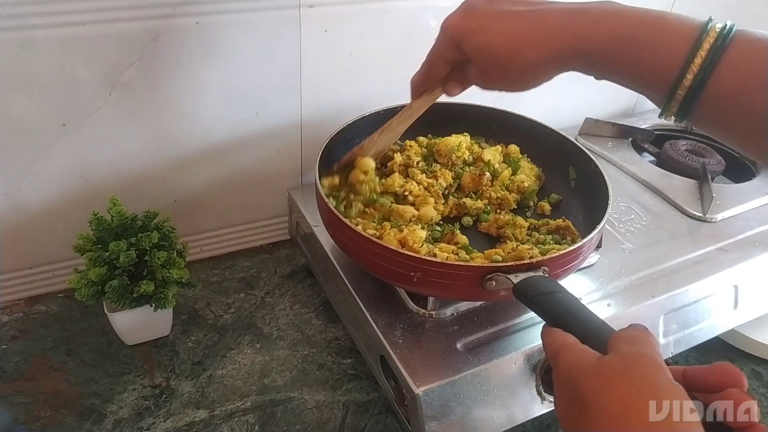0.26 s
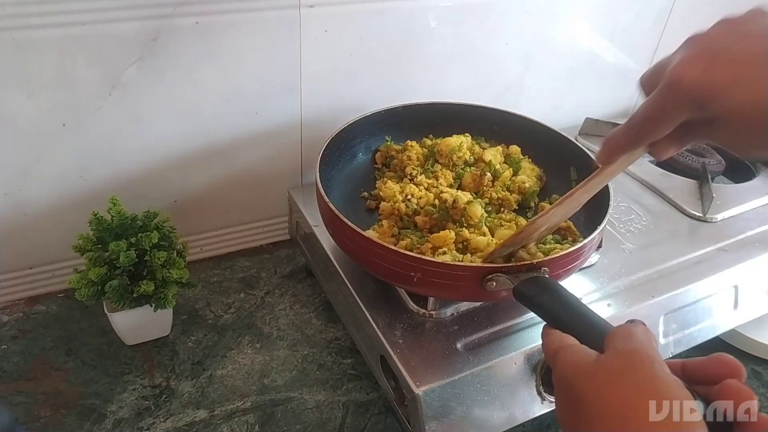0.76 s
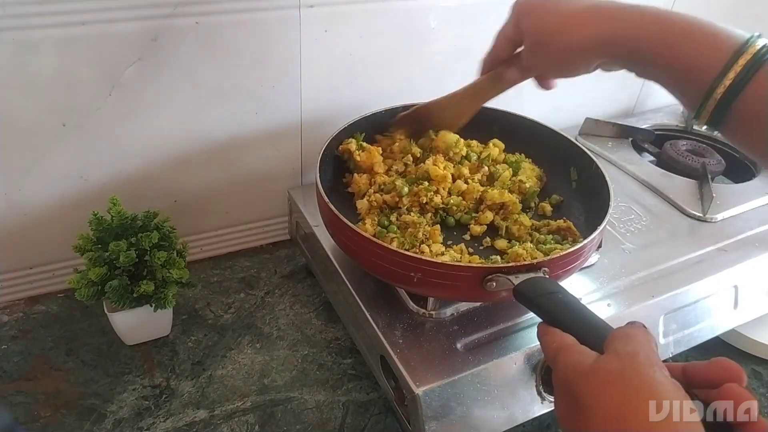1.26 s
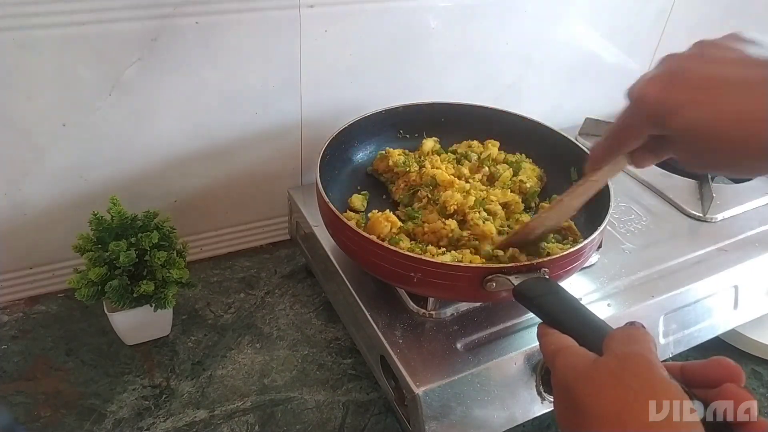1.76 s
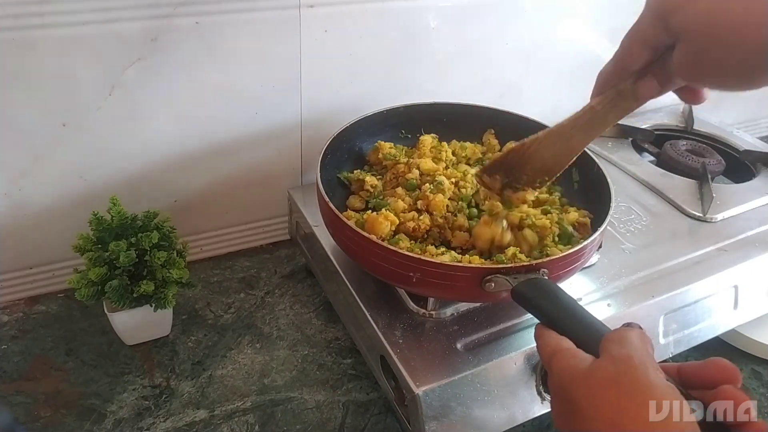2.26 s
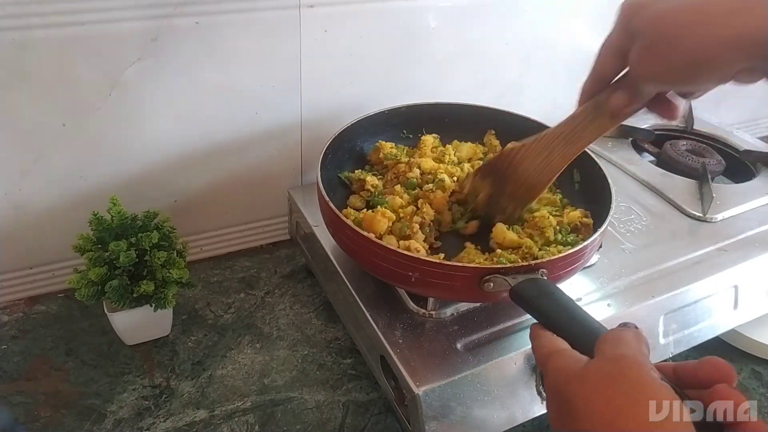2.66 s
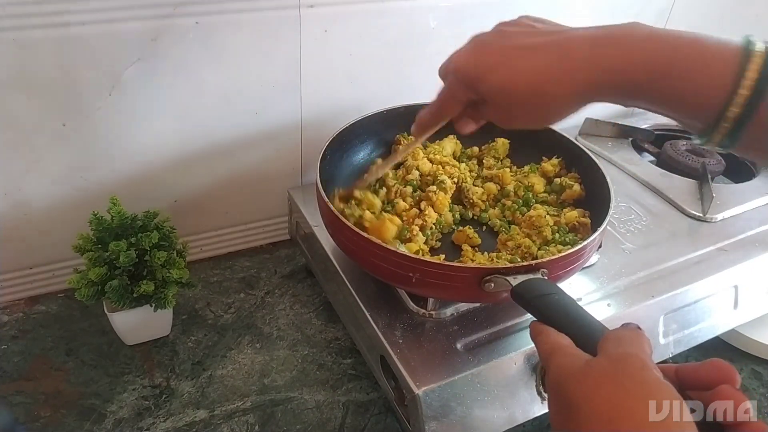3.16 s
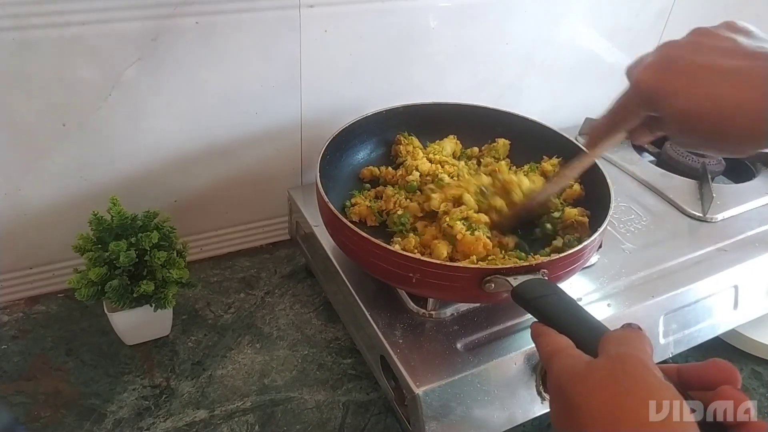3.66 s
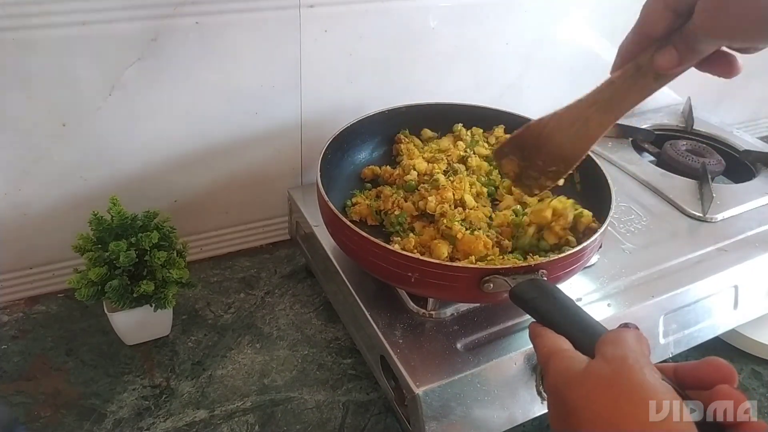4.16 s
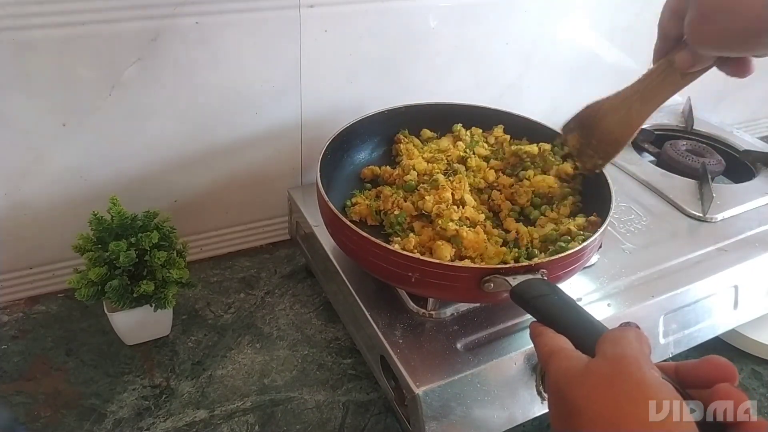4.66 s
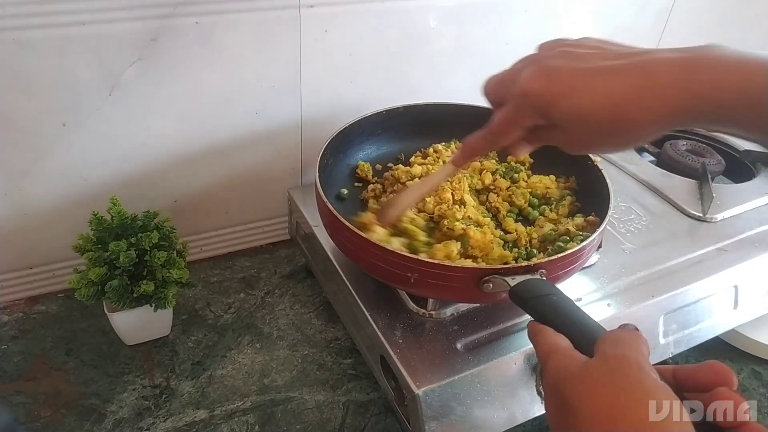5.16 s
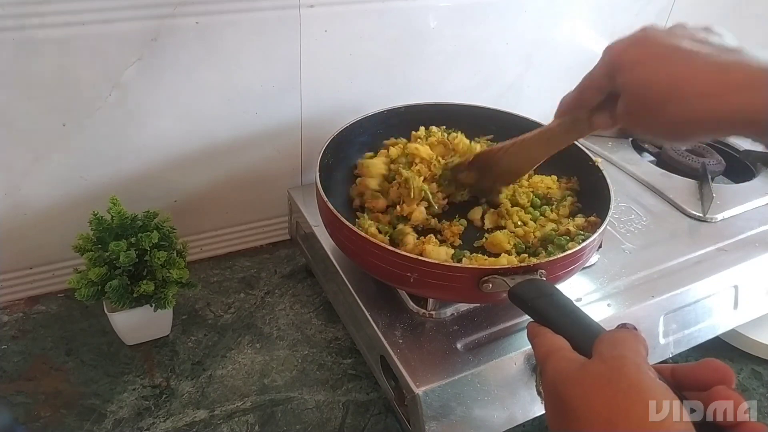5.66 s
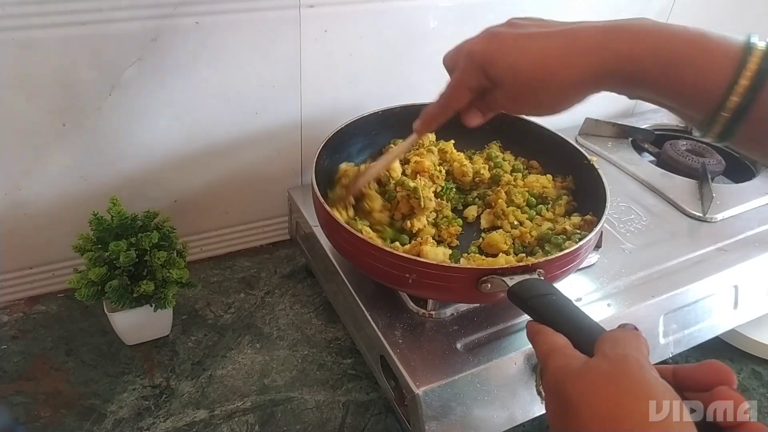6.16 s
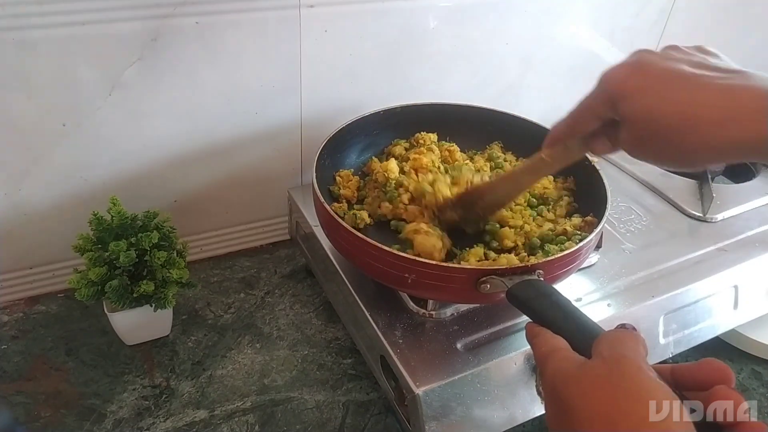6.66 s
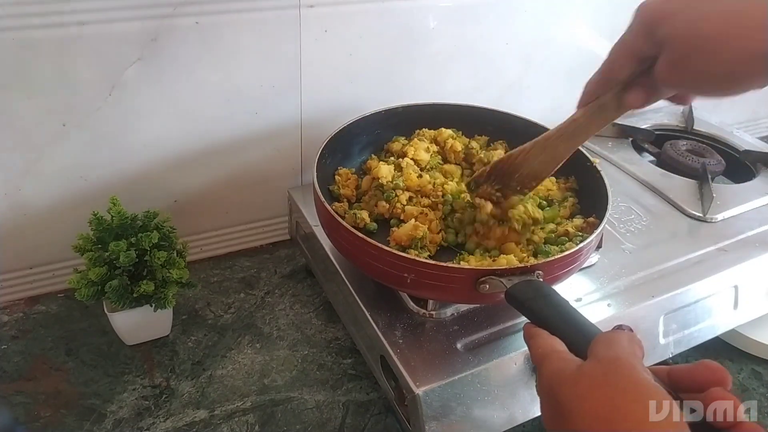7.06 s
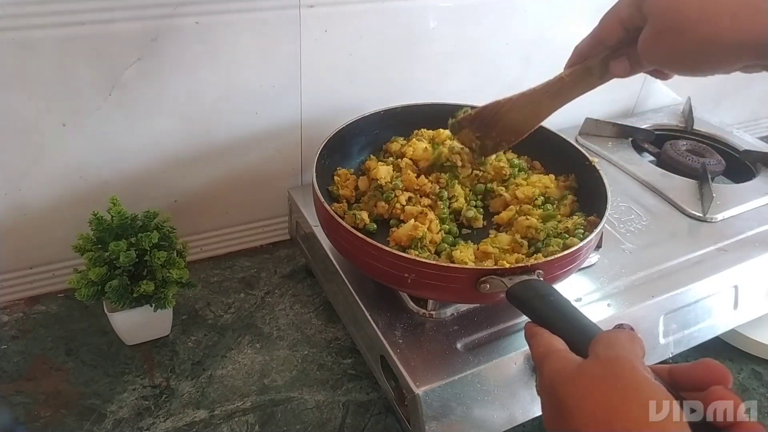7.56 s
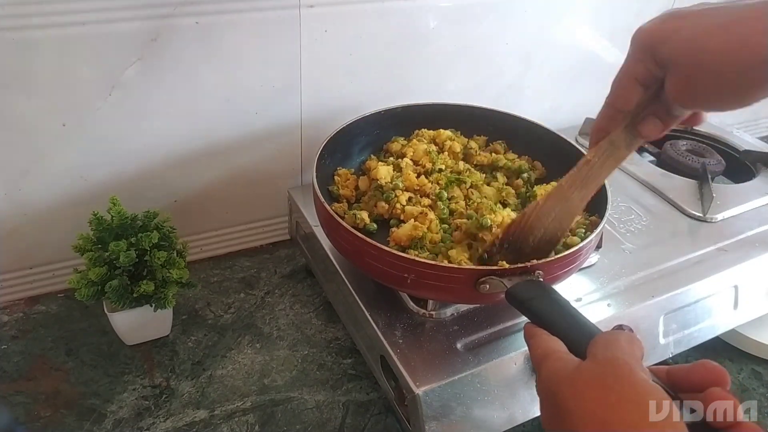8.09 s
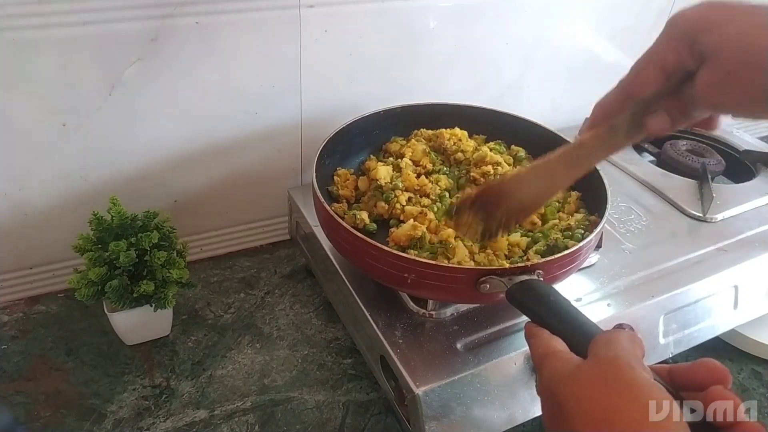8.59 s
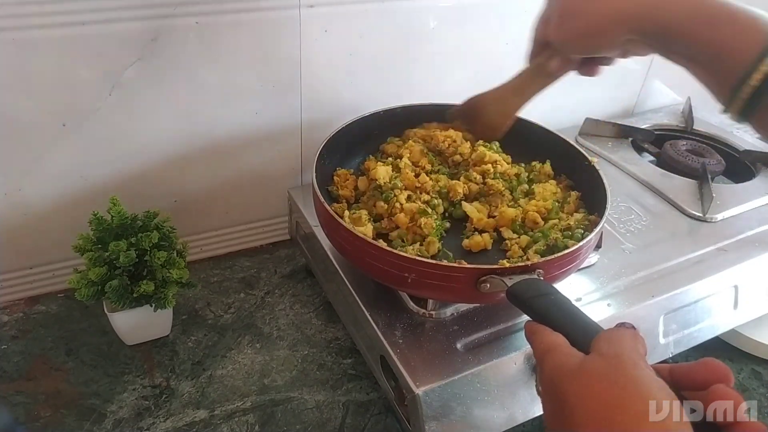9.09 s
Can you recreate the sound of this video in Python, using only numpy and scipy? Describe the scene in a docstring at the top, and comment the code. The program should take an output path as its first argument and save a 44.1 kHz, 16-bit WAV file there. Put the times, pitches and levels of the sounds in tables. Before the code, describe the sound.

A wooden spatula knocks and scrapes around a frying pan, stirring crumbly food over a faint sizzle, with small bangle clinks.

```python
"""Stirring a frying pan

A wooden spatula turns a thick, crumbly mixture in a nonstick pan on a steel hob, in a hard-walled
kitchen. Each stroke lands with a knock that excites the pan's modes and may rock it into a clack;
friction then makes the blade scrape and groan while the food rustles. Bangles clink on the stirring
wrist and moisture sizzles faintly."""
import sys
import numpy as np
from scipy import signal
from scipy.fft import rfft, irfft, next_fast_len
from scipy.io import wavfile
from scipy.ndimage import uniform_filter1d

SR = 44100
rng = np.random.default_rng(int(sys.argv[2]) if len(sys.argv) > 2 else 0)


def transcribe(signal):
    """Save signal, clipped to [-1, 1], as a 16-bit WAV file at the path in sys.argv[1]."""
    frames = np.atleast_2d(signal).T
    limited = np.clip(frames, -1, 1)
    pcm = np.round(limited * 32767).astype(np.int16)
    wavfile.write(sys.argv[1], SR, pcm)


N = 411453
TIME = np.arange(N) / SR

# landings of the blade: t/s, knock level/dB, thump level/dB, crunch level/dB, contact decay/s,
# hardness/(dB per octave), blade note f/Hz, drag level/dB
LANDINGS = [(0.659, -55, -57, -62, 0.0052, -4, 800, -66), (0.675, -72, -58, -56, 0.0028, -1, 800, -72),
            (0.932, -36.5, -45.5, -47.5, 0.013, -3, 1810, -46),
            (1.313, -60, -54, -53, 0.0075, -5, 796, -70), (1.326, -33, -47, -45.5, 0.009, 1.5, 2250, -52.5),
            (1.897, -35, -54, -42, 0.0028, 1.5, 2200, -47),
            (1.919, -36.5, -49, -56, 0.017, -0.5, 2090, -58), (1.982, -44, -50, -63, 0.013, -4, 900, -56),
            (2.182, -46, -62, -55, 0.0086, -3, 2000, -58), (2.339, -41.5, -66, -68, 0.0046, -8, 1400, -75),
            (2.635, -48, -41, -51, 0.012, -4, 1450, -49),
            (3.026, -38, -41.5, -45.5, 0.0036, -3.5, 1650, -67),
            (3.037, -49, -42.5, -53, 0.0035, -8, 1100, -68),
            (3.545, -41, -53.5, -57, 0.015, -7.5, 1950, -58),
            (3.728, -33, -47.5, -43, 0.0047, 0.5, 1510, -49.5),
            (3.756, -33.5, -51, -52, 0.018, -1, 1390, -49.5),
            (4.055, -49, -45.5, -64, 0.015, -6, 1600, -55.5), (4.4, -62, -52, -68, 0.011, -9, 800, -75),
            (4.409, -37, -47.5, -42.5, 0.006, 6.5, 1050, -61),
            (4.505, -46, -45.5, -43.5, 0.012, 2, 800, -51.5),
            (4.591, -41.5, -51.5, -62, 0.015, 1.5, 1050, -55.5),
            (4.676, -47.5, -60, -64, 0.0071, -2.5, 2000, -65), (4.817, -51, -55, -62, 0.0083, 4, 1650, -71),
            (5.637, -29.5, -44, -42.5, 0.005, -2, 2430, -46),
            (5.647, -36, -45.5, -50, 0.0056, -6, 1110, -52), (6.582, -56, -63, -55, 0.0083, 9.5, 2000, -70),
            (6.738, -29.5, -40.5, -41.5, 0.01, 0, 1000, -48),
            (6.766, -35.5, -43.5, -56, 0.013, -1.5, 1040, -63),
            (7.505, -34, -56, -47, 0.012, -0.5, 1400, -51.5), (7.79, -46, -51, -58, 0.0096, 1.5, 900, -68),
            (8.102, -47, -55, -48, 0.03, 7, 1880, -56.5), (8.184, -51, -59, -60, 0.015, 2, 1880, -60),
            (8.461, -42.5, -51.5, -54, 0.0097, -2.5, 850, -58),
            (8.527, -47.5, -54, -53, 0.014, 0, 1900, -66), (8.785, -20.5, -40, -41, 0.0018, 2, 2710, -43.5),
            (8.795, -26.5, -43.5, -56, 0.0069, -5, 900, -55)]
# bright hiss of rustle and sizzle, with the microphone's resonance near 9.5 kHz: f/Hz, level/dB
HISS_SPECTRUM = [(1000, -18.5), (3000, -15), (5600, -13), (7200, -9), (8600, -3), (10000, -1.5),
                 (11000, -6.5), (11900, -16.5), (13500, -16), (15300, -23)]


def landings():
    """Impact of wood on metal: the blade knocks, the pan's base thumps and the food between crunches."""
    thump_spectrum = [(60, -32), (150, -18.5), (250, -12), (350, 4.5), (480, -1.5), (700, -7), (1100, -11),
                      (2500, -36.5)]  # f/Hz, level/dB
    out = np.zeros(N)
    for s, knock_db, thump_db, crunch_db, fade_s, hardness, blade_hz, _ in LANDINGS:
        rise_s = 0.1 * fade_s  # food cushions the blow, so a longer contact builds up more slowly
        knock = contact(knock_spectrum(hardness), fade_s, drag_db=-30.5, drag_s=0.062, rise_s=rise_s)
        thump = contact(thump_spectrum, fade_s, drag_db=-26.5, drag_s=0.11, rise_s=rise_s)
        crunch = contact(HISS_SPECTRUM, fade_s, drag_db=-6, drag_s=0.045, rise_s=rise_s)
        add(out, s, from_db(knock_db - 7.5) * (knock + resonance(knock, blade_hz, width_hz=186)))
        add(out, s, from_db(thump_db + 2) * thump)
        add(out, s, from_db(crunch_db + 2.5) * crunch)
    return out


def knock_spectrum(hardness, pivot_hz=1400):
    """Contact stiffness: a harder blow tilts the wood's spectrum towards the treble."""
    wood_spectrum = [(90, -56), (250, -23), (600, -3), (900, -1), (1400, 2), (2000, -0.5), (2700, -4.5),
                     (3300, -10.5), (5000, -17.5), (8000, -28.5)]  # f/Hz, level/dB
    return [(hz, db + hardness * np.log2(hz / pivot_hz)) for hz, db in wood_spectrum]


def pan(force, spot_db=2.4, spots_per_s=6):
    """Modal response: the food-damped pan rings, and each point of contact favours different modes."""
    pan_modes = [(178, 18.6, 5), (261.3, 12, 6), (389, 62, -7), (470, 38, -3.5), (532, 14, -3.5),
                 (616.5, 15, 5), (744, 24, -5), (797, 83, 0.8), (872, 27, -8.5), (1030, 56, 2.5),
                 (1106, 30, 2), (1187, 13, 0), (1400, 7.3, -17), (1685, 220, -9.5), (1900, 75, -6),
                 (2074, 225, 0), (2686, 130, 0), (2834, 93, -2), (3430, 130, -12), (3780, 210, 0),
                 (4190, 180, -0.5), (4920, 130, -1)]  # f/Hz, bandwidth/Hz, level/dB relative to the force
    ringing = 0
    for hz, width_hz, db in pan_modes:
        coupling = from_db(spot_db * drift(spots_per_s))
        ringing += from_db(db) * resonance(force * coupling, hz, width_hz)
    return force + ringing


def scraping():
    """Sliding friction: the blade rubs and scratches the coating while crumbs rustle ahead of it."""
    # sweeps along the pan's wall: start t/s, hold/s, rustle level/dB, scratch level/dB
    wall_sweeps = [(0.128, 0.24, -44.5, -49.5), (1.423, 0.092, -49, -57.5), (3.027, 0.21, -51.5, -61.5),
                   (4.773, 0.083, -51, -58), (4.904, 0.28, -47.5, -59), (6.008, 0.23, -48, -53.5),
                   (8.08, 0.017, -48, -58), (9.111, 0.22, -48.5, -53)]
    # short pushes across the base: middle t/s, duration/s, level/dB
    base_pushes = [(0.01, 0.13, -47), (0.2, 0.057, -50), (0.39, 0.15, -51), (1.168, 0.14, -65),
                   (1.873, 0.098, -56), (2.218, 0.1, -55), (2.402, 0.15, -53), (2.865, 0.17, -56),
                   (3.187, 0.1, -46), (3.93, 0.29, -49), (4.283, 0.11, -53.5), (4.832, 0.1, -65),
                   (5.106, 0.2, -47.5), (5.87, 0.25, -54), (6.234, 0.21, -50), (6.725, 0.091, -49),
                   (7.057, 0.21, -53.5), (7.277, 0.22, -58.5), (7.734, 0.21, -57.5), (7.936, 0.083, -56),
                   (8.21, 0.075, -50.5), (8.44, 0.1, -55.5), (8.606, 0.23, -55.5)]
    # heaps of food sliding off the blade: middle t/s, level/dB
    food_tumbles = [(2.28, -50), (2.98, -55), (3.68, -55), (4.1, -45), (4.99, -59), (6.075, -48),
                    (7.11, -49.5), (7.46, -54), (7.82, -50.5), (8.125, -51)]
    # crumbs settling throughout: t/s, level/dB
    settling_levels = [(0.0, -50.5), (1.8, -53.5), (2.45, -57), (3.35, -54), (4.2, -57), (9.3, -56.5)]
    drag = together(*(from_db(db) * stroke(s, attack_s=0.017, hold_s=0.035, release_s=0.11)
                      for s, *_, db in LANDINGS))
    push = sum(from_db(db) * swell(s, length_s) for s, length_s, db in base_pushes)
    tumble = sum(from_db(db) * swell(s, length_s=0.14) for s, db in food_tumbles)
    # the blade cuts into the food as it lands
    entry = sum(from_db(crunch_db - 4.5) * swell(s, length_s=0.043)
                for s, _, _, crunch_db, *_ in LANDINGS)
    settling = from_db(np.interp(TIME, *np.transpose(settling_levels)))
    swept_food, swept_wall = 0, 0
    for s, hold_s, rustle_db, scratch_db in wall_sweeps:
        pressure = stroke(s, attack_s=0.035, hold_s=hold_s, release_s=0.11)
        swept_food += from_db(rustle_db) * pressure
        swept_wall += from_db(scratch_db) * pressure
    idle_rub, idle_scratch = from_db(-78), from_db(-70.5)  # light contact between strokes
    rub_gain = together(drag, push, from_db(-5.5) * swept_wall, idle_rub)
    scratch_gain = together(from_db(1) * drag, from_db(-6) * push, swept_wall, idle_scratch)
    rustle_gain = together(from_db(-5.5) * drag, swept_food, tumble, entry, settling)

    rub_spectrum = [(50, -33), (130, -10.5), (250, -15.5), (350, -1), (520, -2), (800, -0.5), (1200, -8),
                    (2500, -30)]  # f/Hz, level/dB
    scratch_spectrum = [(400, -7.5), (900, -10), (1400, 5.5), (2200, 0), (3200, -3.5), (5000, -7),
                        (6800, -2.5), (8500, -30), (14000, -24)]  # f/Hz, level/dB
    rub = friction(rub_spectrum, per_s=700, spread_db=2.5, judder_db=1.5, judder_rate=45)
    scratch = friction(scratch_spectrum, per_s=1300, spread_db=2.5, judder_db=2, judder_rate=64)
    blade = pan(from_db(-1.5) * rub_gain * rub + from_db(-3.5) * scratch_gain * scratch)
    rustle = friction(HISS_SPECTRUM, per_s=5000, spread_db=2.5, judder_db=1.74, judder_rate=60)
    return blade + from_db(1) * rustle_gain * rustle


def clacks():
    """Rocking impact: the pan falls back and chatters briefly on the burner's prongs."""
    rockings = [(1.017, -33.5), (1.984, -34), (3.824, -32.5), (5.722, -32)]  # t/s, level/dB
    clack_spectrum = [(100, -16), (400, -5), (1000, 5), (2100, 3), (3200, -4), (3800, -6), (4400, 5),
                      (4900, -31), (7000, -8), (14000, -35)]  # f/Hz, level/dB
    out = np.zeros(N)
    for s, db in rockings:
        clack = contact(clack_spectrum, fade_s=0.012, drag_db=-34, drag_s=0.027)
        add(out, s, from_db(db - 7.5) * clack)
    return out


def skips(per_s=130, spread_db=2.5, loss_db=7.5):
    """Inelastic rebound: after landing, the blade skips in an uneven run of weakening knocks."""
    skip_runs = [(0.955, 0.06, -50.5, 3.5), (1.346, 0.068, -52, -4), (1.933, 0.035, -43, -3.5),
                 (2.047, 0.037, -51.5, -2), (2.665, 0.026, -49, 2), (3.045, 0.075, -52, -4),
                 (5.656, 0.06, -44.5, -2), (6.751, 0.067, -44, -1), (8.808, 0.056, -40.5, -3.5)]  # start t/s, duration/s, level/dB, hardness/(dB per octave)
    out = np.zeros(N)
    for s, length_s, db, hardness in skip_runs:
        gaps, strengths = rng.uniform(0.4, 1.6, 24), rng.standard_normal(24)
        delays_s = (np.cumsum(gaps) - gaps[0]) / per_s
        for after_s, strength in zip(delays_s, strengths):
            if after_s < length_s:
                level = db - 6.5 + spread_db * strength - loss_db * after_s / length_s
                add(out, s + after_s, from_db(level) * click(knock_spectrum(hardness)))
    return out


def grating():
    """Granular friction: dry crumbs jam under the blade and grind over the coating."""
    crumb_jams = [(0.18, 0.065, -48), (0.33, 0.07, -54), (1.37, 0.025, -50), (1.9, 0.025, -51),
                  (4.92, 0.058, -49.5), (6.05, 0.027, -50), (8.824, 0.055, -47), (9.168, 0.04, -59)]  # start t/s, hold/s, level/dB
    grit_spectrum = [(600, -24), (1500, 3), (2300, 0.5), (3600, 1.5), (5500, -4), (7000, -1), (10000, -15),
                     (15000, -21)]  # f/Hz, level/dB
    pressure = together(*(from_db(db) * stroke(s, attack_s=0.0064, hold_s=hold_s, release_s=0.035)
                          for s, hold_s, db in crumb_jams))
    return pressure * friction(grit_spectrum, per_s=1200, spread_db=3.2, judder_db=2.4, judder_rate=90)


def groans():
    """Stick-slip motion: the blade's uneven slips bunch around one rough pitch."""
    slip_spells = [(0.39, 0.062, 605, -48), (0.674, 0.03, 320, -51), (3.094, 0.052, 440, -48),
                   (3.162, 0.026, 424, -49), (4.077, 0.04, 405, -68), (4.876, 0.11, 367, -51.5),
                   (5.119, 0.12, 473, -49), (6.229, 0.073, 1014, -46), (7.53, 0.072, 1410, -48)]  # middle t/s, half-duration/s, f/Hz, level/dB
    out = np.zeros(N)
    for s, half_s, hz, db in slip_spells:
        size = int(2 * half_s * SR)
        spectrum = [(hz / 2, -32), (hz * 0.73, -11), (hz, 0), (hz * 1.11, -10), (hz * 2.1, -28)]
        slips = coloured(rng.standard_normal(SR // 2), spectrum)
        add(out, s - half_s, from_db(db - 3) * rms_one(slips[-size:] * np.hanning(size)))
    return out


def snaps():
    """Brittle fracture: a hard crumb breaks under the blade's edge with a crisp tick."""
    fractures = [(3.7294, -43), (4.4106, -42), (8.786, -37)]  # t/s, level/dB
    snap_spectrum = [(1500, -16), (3500, -12), (6500, 1), (9000, 9), (11000, -7), (12500, -19),
                     (15000, -17)]  # f/Hz, level/dB
    out = np.zeros(N)
    for s, db in fractures:
        snap = contact(snap_spectrum, fade_s=0.0014, drag_db=-40, drag_s=0.01, impact_db=-1)
        add(out, s, from_db(db) * snap)
    return out


def bangles():
    """Collision of small rings: a dry tick and a high clink, each at a slightly different pitch."""
    touches = [(0.088, -43), (1.0969, -43), (1.5808, -44), (2.049, -36), (2.2758, -37.5), (3.88, -35),
               (5.8134, -42), (6.8864, -35), (7.1092, -40), (7.624, -44), (7.832, -39), (8.529, -37.5),
               (8.9297, -35)]  # t/s, level/dB
    clink_spectrum = [(3000, -29), (6000, -3), (7500, -11), (9400, 1), (10700, 1), (11350, 13.5),
                      (11900, -7), (13500, -21), (15200, -17)]  # f/Hz, level/dB
    tick_spectrum = [(3500, -22), (6000, 4), (8000, -6), (11000, -2), (15000, 0)]  # f/Hz, level/dB
    out = np.zeros(N)
    for (s, db), detune in zip(touches, rng.normal(1, 0.008, len(touches))):
        detuned = [(hz * detune, level) for hz, level in clink_spectrum]
        clink = contact(detuned, fade_s=0.0052, drag_db=-38, drag_s=0.02, rise_s=0.0008, impact_db=-14)
        tick = contact(tick_spectrum, fade_s=0.002, drag_db=-40, drag_s=0.01,
                       rise_s=0.0008, impact_db=-19)
        add(out, s, from_db(db - 7.5) * clink + from_db(db - 16) * tick)
    return out


def bumps():
    """Plate vibration: the hob's sheet-steel body takes up a shove with a dull, low note."""
    shoves = [(0.69, -56), (1.33, -55), (3.75, -59), (4.419, -49), (4.522, -62), (8.90, -51)]  # t/s, level/dB
    hob_spectrum = [(30, -25), (80, -8), (125, 2.5), (190, -4), (400, -37)]  # f/Hz, level/dB
    out = np.zeros(N)
    for s, db in shoves:
        bump = contact(hob_spectrum, fade_s=0.017, drag_db=-20, drag_s=0.05, rise_s=0.004)
        add(out, s, from_db(db) * bump)
    return out


def sizzle():
    """Vaporisation: moisture spits all across the pan, so each ear gets its own fine crackle."""
    ears = [friction(HISS_SPECTRUM, per_s=12000, spread_db=1.8, judder_db=1.1, judder_rate=32)
            for _ in range(2)]
    return from_db(-56.5) * np.array(ears)


def kitchen(x, direct_db, reflected_db, strokes_per_s, count=3):
    """Moving source: as the blade circles the pan, its sound fades between sets of reflections."""
    angle = np.pi * strokes_per_s * TIME
    shares = [np.sqrt(2 / count) * np.cos(angle + np.pi * k / count) for k in range(count)]
    reflected = sum(reflections(x * share, near_s=0.0058, tail_db=-2.5) for share in shares)
    direct = np.array([np.interp(TIME - 0.00009, TIME, x), x])  # the pan is nearer the right ear
    return from_db(direct_db) * direct + from_db(reflected_db) * reflected


def reflections(x, near_s, tail_db, size=32768):
    """Reverberation: early reflections from hob and wall, then a tail with a decay time for each band."""
    decay_times = [(150, 0.82), (400, 0.74), (1000, 0.64), (2700, 0.57), (6000, 0.12), (12000, 0.69)]  # f/Hz, T60/s
    t, hz = np.arange(size) / SR, np.linspace(0, SR / 2, size // 2 + 1)
    centres, t60s = np.transpose(decay_times)
    field, tail = rfft(diffuse_noise(size)), 0
    for share, t60 in zip(np.eye(len(t60s)), t60s):
        band_gain = np.interp(np.log(hz + 1), np.log(centres), share)
        tail += irfft(field * band_gain) * from_db(-60 * t / t60)
    early = rms_one(diffuse_noise(size) * np.exp(-t / near_s))
    late = from_db(tail_db) * rms_one(tail * (1 - np.exp(-t / 0.0061)))
    # the room spreads the sound in time and leaves its broad colour alone
    response = np.array([rms_one(evened(ear, width_hz=157)) for ear in early + late]) / np.sqrt(size)
    return signal.oaconvolve(x[None], response, axes=1)[:, :N]


def room_noise():
    """Ambient noise: a steady, diffuse background, strongest in the bass."""
    ambient_spectrum = [(20, -1.5), (45, -13.5), (90, -18), (200, -17.5), (450, -18.5), (800, -21.5),
                        (1300, -26.5), (4000, -33), (15000, -43)]  # f/Hz, level/dB
    return np.array([coloured(ear[:N], ambient_spectrum) for ear in diffuse_noise(next_fast_len(N))])


def diffuse_noise(size):
    """Diffuse field: noise from all sides, whose likeness at the two ears varies with frequency."""
    side_levels = [(30, -0.5), (110, -2), (200, -8.5), (380, -9), (700, -1.5), (1290, 3), (2380, -1.5),
                   (4400, -1.5), (15000, 2.5)]  # f/Hz, level/dB of side relative to mid
    mid, side = rng.standard_normal((2, size))
    width = from_db(at_hz(side_levels, np.arange(size // 2 + 1) * SR / size))
    ears = rfft(mid) + rfft(side) * width * [[1], [-1]]
    return irfft(ears / np.sqrt(1 + width ** 2), size)


def contact(spectrum, fade_s, drag_db, drag_s, rise_s=0.00022, impact_db=-8,
            rattle_db=2, rattle_rate=300, size=8192):
    """Rough contact: an impact, tiny collisions and a weaker drag, with the energy of 20 ms at rms 1."""
    t = np.arange(size) / SR
    fade = np.exp(-t / fade_s)
    envelope = (fade + from_db(drag_db) * np.exp(-t / drag_s)) * (1 - np.exp(-t / rise_s))
    # after the first impact the parts rebound unevenly
    rebounds = np.interp(t * rattle_rate, np.arange(size), rng.standard_normal(size))
    force = envelope * from_db(rattle_db * rebounds * (1.5 - fade)) * rng.standard_normal(size)
    force[int(rise_s * SR)] += from_db(impact_db) * np.linalg.norm(force)
    burst = coloured(evened(force, width_hz=240), spectrum)
    return burst / np.linalg.norm(burst) * np.sqrt(SR / 50)


def click(spectrum, size=2048):
    """Impulse response: one clean touch, with the energy of 20 ms at rms 1."""
    return coloured(signal.unit_impulse(size), spectrum) * np.sqrt(SR / 50)


def friction(spectrum, per_s, spread_db, judder_db, judder_rate):
    """Shot noise: random micro-slips of uneven size, modulated by a judder; rms 1."""
    count = int(per_s * N / SR)
    when, rarity, sign = rng.random((count, 3)).T
    sizes = from_db(spread_db * np.minimum(-np.log(1 - rarity), 4)) * np.sign(sign - 0.5)
    slips = np.bincount((when * N).astype(int), sizes, N)
    return rms_one(coloured(slips * from_db(judder_db * drift(judder_rate)), spectrum))


def stroke(start_s, attack_s, hold_s, release_s):
    """Envelope of the hand's pressure: a linear rise to 1, a hold and an exponential decay."""
    t = TIME - start_s
    return np.clip(t / attack_s, 0, 1) * np.exp(-np.clip((t - attack_s - hold_s) / release_s, 0, 20))


def swell(middle_s, length_s):
    """Half-cosine envelope with a peak of 1."""
    return np.cos(np.pi * np.clip((TIME - middle_s) / length_s, -0.5, 0.5))


def drift(rate):
    """Random modulation of spread near 1 that turns about rate times a second."""
    knots = rng.standard_normal(N // 20)
    return np.clip(rms_one(np.interp(TIME * rate, np.arange(len(knots)), knots)), -2, 2)


def resonance(x, hz, width_hz):
    """Damped oscillator: one mode, with gain 1 at its peak."""
    return signal.lfilter(*signal.iirpeak(hz, hz / width_hz, fs=SR), x)


def coloured(x, spectrum, size=4096):
    """Minimum-phase filtering to the given spectrum; white noise keeps its power."""
    cepstrum = irfft(np.log(from_db(at_hz(spectrum, np.linspace(0, SR / 2, size // 2 + 1)))))
    response = irfft(np.exp(rfft(2 * cepstrum[:size // 2], size)))
    return signal.oaconvolve(x, response / np.linalg.norm(response))[:len(x)]


def evened(x, width_hz):
    """Spectral whitening: a burst loses its broad humps and keeps its fine ripple."""
    power = np.abs(rfft(x)) ** 2
    smooth = uniform_filter1d(power, max(int(width_hz * len(x) / SR), 1)) + 1e-12
    return coloured(x, np.column_stack([np.linspace(1, SR / 2, len(power)), -10 * np.log10(smooth)]))


def together(*gains):
    """Incoherent sum: unrelated sounds add in power."""
    return np.sqrt(sum(gain ** 2 for gain in gains))


def add(track, s, sound):
    """Superposition of a sound on a track at time s."""
    start = max(round(s * SR), 0)
    track[start:start + len(sound)] += sound[:N - start]


def at_hz(points, hz):
    """Interpolation along a log-frequency axis."""
    table = np.array(points)
    return np.interp(np.log(hz + 1e-9), np.log(table[:, 0]), table[:, 1])


def from_db(db):
    """Level to amplitude ratio."""
    return 10 ** (np.asarray(db) / 20)


def rms_one(x):
    """Normalisation to an rms of 1."""
    return x / np.sqrt(np.mean(x ** 2) + 1e-20)


def scene():
    """Superposition: the stirring sounds into the kitchen, over the sizzle and a low room noise."""
    clinks = bangles()
    struck_pan = pan(landings() + skips() + clacks())
    hob = struck_pan + snaps() + scraping() + grating() + groans() + bumps() + from_db(-2.5) * clinks
    background = from_db(-58.5) * room_noise()
    stirring = kitchen(hob, direct_db=-8, reflected_db=-0.26, strokes_per_s=0.9027)
    close_clinks = from_db(-8.5) * clinks  # the wrist is near, so it adds more direct sound
    return stirring + close_clinks + sizzle() + background


def record(dry):
    """Band limiting: a steep low-pass filter cuts the highest treble."""
    cutoff_hz = 15500
    return signal.sosfilt(signal.ellip(10, 0.2, 70, cutoff_hz, fs=SR, output="sos"), dry)


dry = scene()
out = record(dry)
transcribe(out)
```